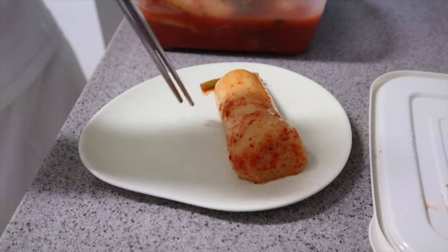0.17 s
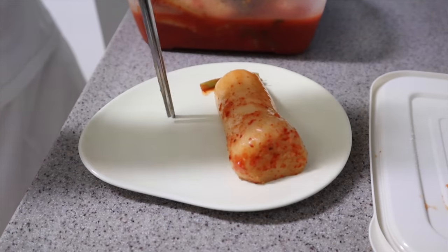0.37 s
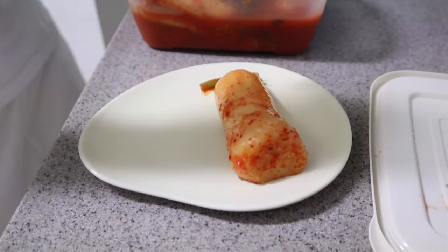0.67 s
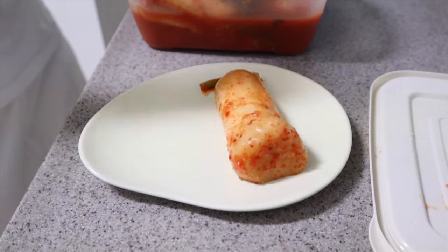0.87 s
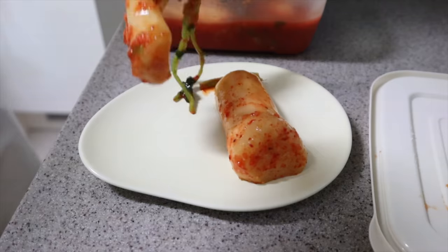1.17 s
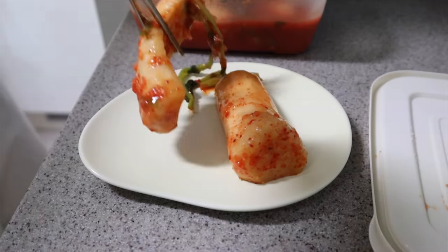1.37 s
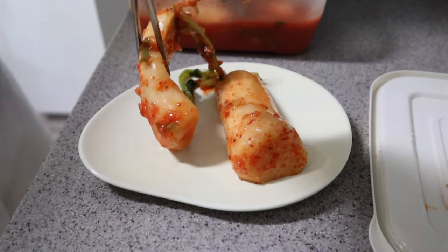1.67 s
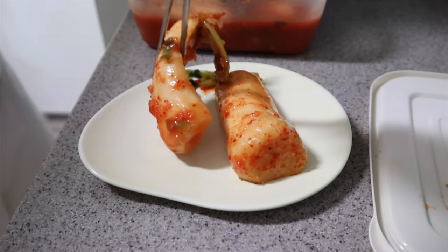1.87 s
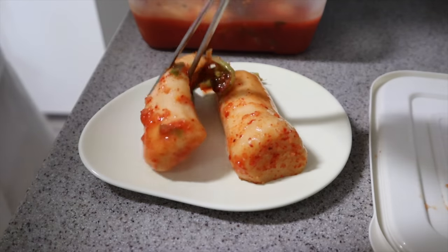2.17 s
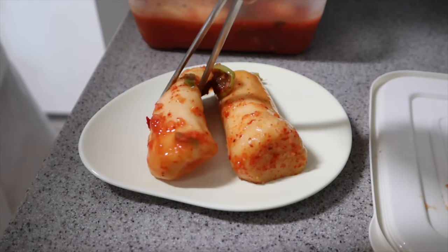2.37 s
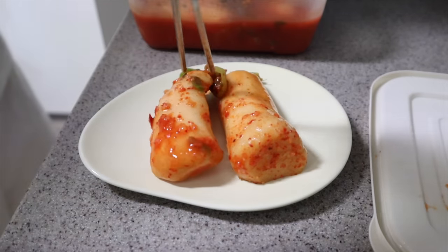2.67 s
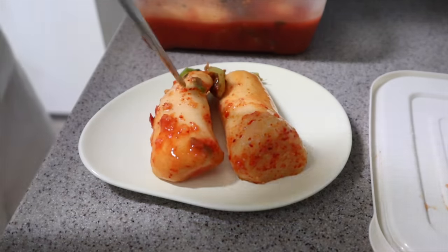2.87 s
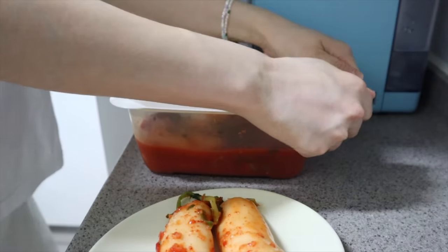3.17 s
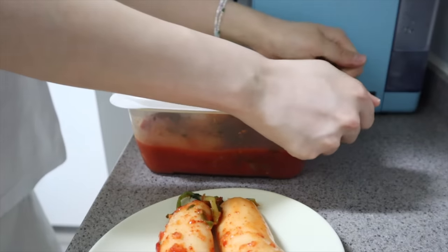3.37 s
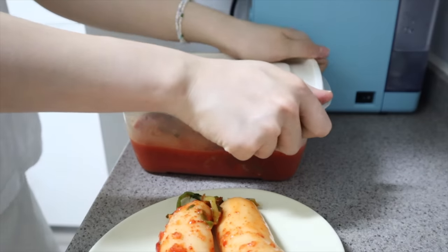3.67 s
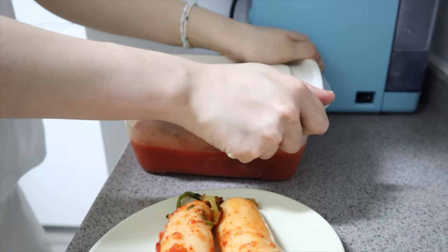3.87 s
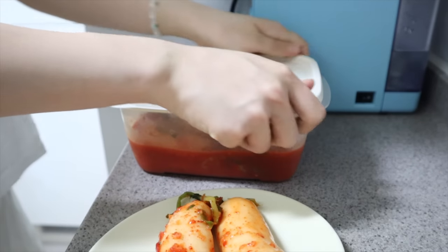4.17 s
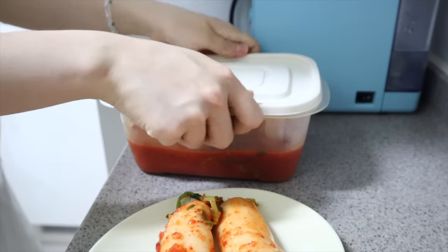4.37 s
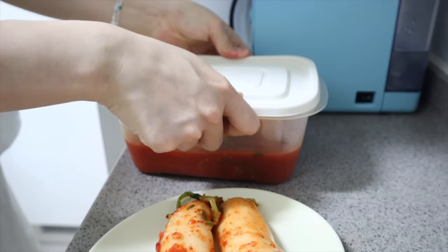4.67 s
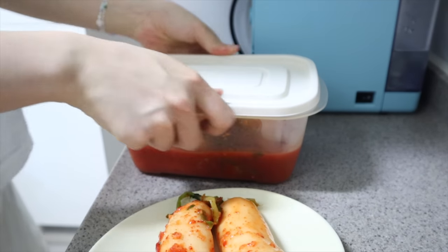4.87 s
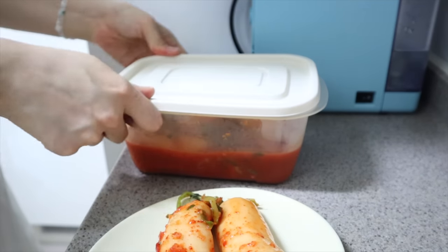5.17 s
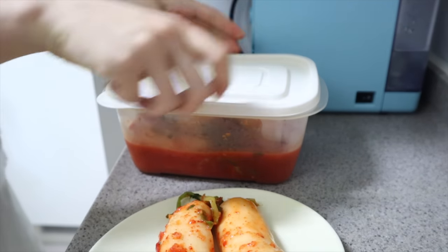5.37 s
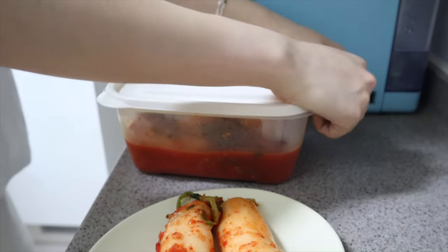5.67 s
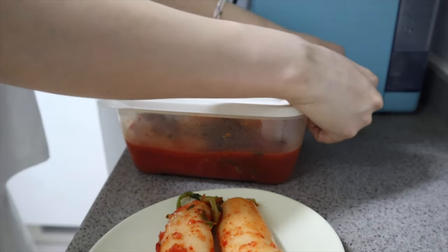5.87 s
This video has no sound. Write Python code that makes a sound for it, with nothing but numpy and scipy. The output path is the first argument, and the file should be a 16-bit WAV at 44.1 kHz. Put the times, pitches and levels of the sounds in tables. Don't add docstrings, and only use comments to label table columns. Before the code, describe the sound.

A low, slightly uneven appliance rumble runs throughout a small, hard-walled kitchen, heard closely in stereo. A tiny tick comes at 0.24 s, then steel tongs clack on a ceramic plate at 0.34 s, bright and loud, and again more softly at 0.49 s, with a short rattle and thin decaying ring. From about 1.0 to 2.9 s there are only sparse, faint wet ticks of food and tongs over the hum. At 3.3 s hands start on a plastic tub lid: skin rubs, creaks and hollow low knocks cluster around 3.4-3.9 s. A sharper knock lands at 4.1 s, with clicks and scuffs to 4.6 s, lighter touches at 4.85 and 5.02 s, and a strong crack at 5.11 s. Soft brushing follows, then busy knocks at 5.64-5.78 s. At 5.92 s the lid seats with the loudest snap, boomy and crisp, then a brief creak.

```python
import sys
import numpy as np
from scipy import signal
from scipy.fft import rfft, irfft, next_fast_len
from scipy.io import wavfile
from scipy.ndimage import uniform_filter1d, map_coordinates

SR = 44100
rng = np.random.default_rng(int(sys.argv[2]) if len(sys.argv) > 2 else 0)


def invert_db(x):
    u = np.asarray(x, float) / 20
    return 10 ** u


def generate_wav(sig):
    pcm = np.round(np.clip(np.atleast_2d(sig).T, -1, 1) * 32767).astype(np.int16)
    wavfile.write(sys.argv[1], SR, pcm)


N = 265305

# start in seconds, peak level in dB, time the tips stay on the glaze in seconds.
TONG_TAPS = [
    (0.3433, 2.5, 0.16),
    (0.4913, -0.5, 0.12),
]
# frequency in Hz, width in Hz, level in dB.
LID_PANEL = [(525, 73, 2), (665, 110, 1), (758, 127, 0), (1175, 446, -5.5), (1389.4, 190, -4),
             (1643, 110, -12.5), (1960, 500, -16), (2610, 380, -20)]
# frequency in Hz, density in dB per Hz.
RIM_COLOUR = [(880, 3), (1500, -8), (1940, -8), (3280, -14.5), (3960, -13), (6000, -22.5), (10000, -24.5),
              (16000, -30)]
# frequency in Hz, level in dB.
NEAR_SIDE = [(60, -41), (250, -21.5), (500, -15), (1000, -5.5), (3000, 1.5), (6000, 4), (10000, 8.5),
             (15000, 3.5)]


def unit(x):
    return x / np.sqrt(np.mean(x ** 2) + 1e-20)


def along(points, hz):
    f, v = np.transpose(points)
    return np.interp(np.log(hz + 1), np.log(f + 1), v)


def wobble(rate):
    knots = rng.standard_normal(int(N * rate / SR) + 4)
    return map_coordinates(knots, [np.arange(N) * rate / SR])


def filtered(x, response):
    m = next_fast_len(N + SR // 4)
    return irfft(rfft(x, m) * response(np.fft.rfftfreq(m, 1 / SR)), m)[..., :N]


def body(modes):
    def response(f):
        total = 0
        for k, (hz, width, db) in enumerate(modes):
            damping = 1j * f * abs(width)
            total = total + (-1) ** k * invert_db(db) * damping / (hz * hz - f * f + damping)
        return total
    return response


def add(track, s, sound):
    spot = track[round(s * SR):][:len(sound)]
    spot += sound[:len(spot)]


def burst(t60, size):
    x = rng.standard_normal(size) * invert_db(-60 * np.arange(size) / SR / max(t60, 1e-3))
    return x / np.linalg.norm(x)


def rumble():
    # frequency in Hz, density in dB per Hz.
    air_colour = [(12, -33), (24, -9), (38, -5), (86, -3.5), (163, -11.5), (182, -18.5), (277, -18),
                  (434, -21.5), (558, -22.5), (607, -20.5), (1530, -28.5), (3070, -36), (8890, -48),
                  (12100, -50), (16000, -80.5)]
    # frequency in Hz, level in dB.
    diffuse_side = [(60, -31), (130, -13), (290, 2), (640, 2), (1410, 4.5), (3100, 6), (6820, 6.5),
                    (15000, 5.5)]
    # time in seconds, rumble level in dB.
    load = [
        (0, -45),
        (.3, -43.5),
        (0.901, -45.5),
        (1.3, -44),
        (2.6, -45.5),
        (6.02, -44),
    ]
    colour = lambda f: invert_db(along(air_colour, f) + [0 * f, along(diffuse_side, f)])
    pair = filtered(rng.standard_normal((2, N)), colour)
    level_db = np.interp(np.arange(N) / SR, *np.transpose(load)) + 0.91 * wobble(3.94)
    return invert_db(level_db) * pair / pair[0].std()


def kitchen(x):
    # frequency in Hz, t60 in seconds.
    wall_decay = [(100, 0.29), (1000, 0.16), (4000, 0.0655), (12000, 0.075)]
    hz, t, z = signal.stft(rng.standard_normal((2, SR // 3)), SR, nperseg=256)
    z[1] *= invert_db(along(NEAR_SIDE, hz) + 3)[:, None]
    fade = invert_db(-60 * t / along(wall_decay, hz)[:, None])
    tail = signal.istft(z * fade, SR, nperseg=256)[1]
    late = np.pad(x, (150, 0))[None]
    return signal.fftconvolve(late, tail / np.linalg.norm(tail[0]), axes=1)[:, :N]


def ticks(rows):
    out = np.zeros(N)
    for s, db, hz, t60 in rows:
        b, a = signal.iirpeak(min(hz, SR / 3), 2.5, SR)
        snap = signal.lfilter(b, a, signal.lfilter(b, a, burst(t60, size=6000)))
        add(out, s, invert_db(db) * snap / np.abs(snap).max())
    return out


def plate():
    plate_hz = [624, 930, 1140, 1520, 1740, 2150, 2742, 2921, 3045, 3200, 3535, 3780, 3845, 4250, 5143,
                6080, 6610, 7130, 7800, 9141, 9700, 10400, 11600, 13000]
    # width in Hz, level in dB at the first spot, level in dB at the second.
    clack_modes = [(77, -21.5, -14), (90.23, -20, -13), (69.3, -21.5, -13.5), (120.2, -16.5, -13),
                   (80, -20, -13), (89.8, -16.5, -10), (80.4, -19, -7.5), (69.7, -17, -11),
                   (64.85, -10.5, -10), (75, -6.5, -3.5), (59.8, -10, -7.5), (120, -2.5, -5.5),
                   (59.97, -4.5, 1.5), (150, -19, -11.5), (106, -4, -6.5), (100, -14.5, -27),
                   (121, -23, -31), (90, -28.5, -22), (169.7, -32, -39), (70.1, -20, -33.5),
                   (299.6, -37, -34), (70.1, -23.5, -19.5), (149.8, -22.5, -27.5), (99.8, -32, -37)]
    # frequency in Hz, level in dB, t60 in seconds.
    ring_modes = [(615, -10, 0.3), (900, -13, .6), (1208.5, -13, 0.52), (1740, -15.5, 0.4),
                  (764, -18.5, 0.26), (2143, -12, 0.34), (2315, -14.5, 0.2), (3150, -4.5, 0.25),
                  (3672, -11, .25), (3800, -9, .35), (5190, -7, 0.3), (6044, -12.5, 0.3), (7133, -13, 0.25),
                  (8940, -14, 0.17), (9590, -18, 0.2), (10400, -16, 0.22), (11630, -20, .15),
                  (3720, 3.5, 0.046), (1851, -17.5, .28), (4400, -23, 0.15), (2900, -14.5, 0.19)]
    second_spot_db = [1.5, 6.5, -3, 2, 0, 2.5, -2, 0.5, -4.5, -3, -3.5, -6, -1.5, -0.5, 0.5, -4.5, -1, 1,
                      1.5, -1.5, 0.5]
    # frequency in Hz, density in dB per Hz.
    rattle_colour = [(250, -24.5), (600, -5.5), (900, -5.5), (1700, -0.5), (2500, -6), (4000, -22),
                     (7000, -49.5)]
    ring_db, tip_db, chatter_db, rattle_db = -27, -12.5, -18, -39.5
    second_damps = 1.1
    rings_on = .38
    twin = .012
    out, rattle, t = np.zeros(N), np.zeros(N), np.arange(SR // 4) / SR
    widths, *spots = np.transpose(clack_modes)
    for spot, ((s, db, stay_s), levels) in enumerate(zip(TONG_TAPS, spots)):
        touching = np.clip(1 - (t / stay_s) ** 2, 0, 1)
        shock = body(zip(plate_hz, widths * second_damps ** spot, levels))
        response = irfft(shock(np.arange(SR // 4 + 1) * 2))[:SR // 4]
        clack = np.convolve(response, np.hanning(5))
        add(out, s, invert_db(db + 5.0) * clack / np.abs(clack).max())
        light = response / np.abs(response).max()
        chatter = signal.fftconvolve(light, touching * burst(0.6, size=SR // 4))
        add(out, s, invert_db(db + chatter_db) * chatter)
        add(rattle, s, invert_db(db) * touching)
        for (hz, level, t60), shift_db in zip(ring_modes, second_spot_db):
            drift = np.cumsum(uniform_filter1d(rng.standard_normal(len(t)), size=100)) * 0.055
            pair = np.sin(2 * np.pi * hz * t + drift)
            pair = pair + 0.5 * np.sin(2 * np.pi * hz * (1 + twin) * t - drift)
            fade = invert_db(db + ring_db + level + spot * shift_db - 60 * t / t60)
            add(out, s, fade * (rings_on + (1 - rings_on) * touching) * pair)
        add(out, s, invert_db(db + tip_db) * np.diff(burst(0.004, size=800)))
    rocking = body([(hz, 110, 0) for hz, *_ in ring_modes])
    grit = rng.standard_normal(N) * invert_db(3.05 * wobble(80.57))
    grit = unit(filtered(grit, lambda f: invert_db(along(rattle_colour, f)) * rocking(f)))
    return out + invert_db(rattle_db) * rattle * grit


def brushes():
    # middle in seconds, length in seconds, rms level in dB, centre in Hz.
    swishes = [(3.556, 0.13, -52, 5000), (3.631, 0.02, -58, 6610), (4.14, 0.053, -49, 4040),
               (4.235, 0.036, -46.5, 9500), (4.272, 0.051, -39.5, 8800), (4.335, 0.043, -48, 6000),
               (4.334, 0.03, -46, 10200), (4.358, 0.027, -44.5, 2450), (4.425, 0.051, -45, 1330),
               (4.434, 0.022, -46, 8860), (4.917, 0.088, -65, 6040), (5.05, 0.034, -59, 10000),
               (5.317, 0.039, -49.5, 10400), (5.589, 0.027, -56, 8200), (5.663, 0.024, -45, 5000),
               (5.688, 0.013, -47, 8500), (5.689, 0.016, -46, 1800)]
    out, t = np.zeros(N), np.arange(-3000, 3000) / SR
    for s, length, db, hz in swishes:
        grain = invert_db(36 * uniform_filter1d(rng.standard_normal(len(t)), size=200))
        grain = grain * rng.standard_normal(len(t))
        swish = unit(signal.lfilter(*signal.iirpeak(min(hz, SR / 3), 2.2, SR), grain))
        add(out, s + t[0], invert_db(db) * swish * np.exp(-(2 * t / length) ** 2))
    return out


def scuffs():
    # start in seconds, peak level in dB, contact t60 in seconds.
    touches = [(3.32, -41, .04), (3.607, -33, 0.022), (3.730, -31.5, 0.0049), (3.777, -38, 0.014),
               (4.178, -41, .008), (4.227, -47, .02), (4.286, -29, 0.016), (4.404, -45, .02),
               (4.424, -29.5, 0.053), (4.536, -32, 0.006), (4.815, -39.5, .04), (4.832, -37, 0.016),
               (5.28, -39.5, 0.028), (5.299, -32.5, 0.073), (5.329, -32, 0.016), (5.586, -33, 0.03),
               (5.734, -55, .02), (5.824, -37.5, 0.026)]
    rasp_db = -2
    edge_hz, rise = 2600, 0.076
    knock, rasp, t = np.zeros(N), np.zeros(N), np.arange(5000) / SR
    for s, db, t60 in touches:
        add(knock, s, invert_db(db + 34.5) * burst(t60, size=3000))
        swell = 1 - np.exp(-t / (rise * t60))
        add(rasp, s, invert_db(db + rasp_db + 41) * swell * burst(2.3 * t60, size=5000))
    thin = lambda f: invert_db(along(RIM_COLOUR, f)) * (1j * f / (edge_hz + 1j * f)) ** 2
    return filtered(knock, body(LID_PANEL)) + filtered(rasp, thin)


def tub():
    # start in seconds, peak level in dB, hollow pitch in Hz.
    thuds = [(3.445, -21, 285), (3.465, -24, 285), (3.497, -22.5, 263), (3.519, -23.5, 361),
             (3.623, -30.5, 260), (3.677, -29, 273), (3.738, -21, 238), (3.742, -22.5, 268),
             (3.762, -34, 293), (3.85, -29.5, 264), (3.887, -24, 272), (3.917, -40, 270),
             (4.101, -35.5, 355), (4.225, -29, 240), (4.293, -20, 257), (4.3004, -29, 264),
             (3.73, -26, 201), (4.485, -20, 270), (4.533, -23.5, 288), (4.592, -27.5, 293),
             (4.857, -23.5, 273), (4.885, -23.5, 186), (5.019, -25.5, 287), (5.038, -26, 312),
             (5.112, -14, 284), (5.152, -32, 292), (5.6422, -19.5, 187.6), (5.659, -15, 306),
             (5.697, -18, 284), (5.726, -16.5, 293), (5.738, -22.5, 187), (5.931, -14, 330)]
    # level in dB, frequency in Hz.
    tap_thuds = [(-26.5, 335), (-30, 180)]
    # start in seconds, peak level in dB, pitch in Hz.
    pings = [
        (3.491, -22, 624),
        (3.519, -15, 572),
        (3.777, -29.5, 476),
        (3.832, -35, 794),
        (4.325, -31, 764),
        (4.435, -30, 743),
        (5.585, -35.5, 1260),
        (5.715, -19.5, 773),
        (5.7225, -17, 797),
        (5.784, -33, 790),
    ]
    # start in seconds, peak level in dB, pitch in Hz, t60 in seconds.
    lugs = [(3.397, -50, 2850, .03), (3.501, -29, 3900, .03), (3.7302, -45, 2620, .08),
            (3.777, -42, 1336, 0.054), (3.887, -42, 2625, .07), (3.832, -41, 845, .04),
            (4.109, -31, 2600, .05), (4.286, -26.5, 2630, 0.036), (4.591, -39, 2100, 0.025),
            (4.591, -37, 600, 0.035), (4.832, -48, 2590, .04), (5.112, -22.5, 2560, 0.036),
            (5.586, -39, 2890, .04), (5.642, -24.5, 900, 0.028), (5.685, -38, 1500, .03),
            (5.701, -29, 900, .04), (5.716, -30, 2300, .06), (5.716, -32, 2920, .04),
            (5.721, -27, 1494, .05), (5.783, -25.5, 1376, 0.03)]
    # start in seconds, level in dB.
    shoves = [(0.2, -42), (3.445, -30), (3.739, -33), (3.886, -39.5), (4.1, -39), (4.535, -36),
              (4.638, -39.5), (4.858, -38), (5.11, -31.5), (5.149, -30.5), (5.181, -40), (5.298, -39),
              (5.643, -33), (5.696, -26), (5.979, -24)]
    # frequency in Hz, width in Hz, level in dB.
    worktop = [(57.7, 11, -0.5), (120.2, 10, 4), (170.4, 28, -3)]
    # frequency in Hz, level in dB, t60 in seconds.
    snap_modes = [(54.5, -4, 0.9), (119, 4, 0.33), (159.9, -2.5, 0.1), (272, -3.5, 0.059), (359, -6, 0.081),
                  (520, -5.5, 0.07), (627, -9.5, 0.028), (764, -22, 0.07), (1047, -4.5, 0.022),
                  (1492, -7, 0.044)]
    # start in seconds, level in dB.
    seating = (5.9185, -7.5)
    ring, boom, t = np.zeros(N), np.zeros(N), np.arange(SR // 8) / SR

    def tone(db, hz, t60, rise_s, drift=0):
        return invert_db(db - 60 * t / t60) * np.sin(2 * np.pi * hz * t + drift) * (1 - np.exp(-t / rise_s))

    passed_on = [(s, db, hz) for s, *_ in TONG_TAPS for db, hz in tap_thuds]
    for s, db, hz in list(thuds) + passed_on:
        add(ring, s, tone(db, hz, t60=0.073, rise_s=0.00149))
    for s, db, hz in pings:
        add(ring, s, tone(db, hz, t60=0.035, rise_s=0.00084))
    for s, db, hz, t60 in lugs:
        drift = .4 * np.cumsum(burst(1.5, size=len(t)))
        add(ring, s, tone(db, hz, t60, rise_s=0.0004, drift=drift))
    for s, db in shoves:
        add(boom, s, invert_db(db + 26.0) * np.hanning(60))
    seat_s, seat_db = seating
    for hz, db, t60 in snap_modes:
        add(ring, seat_s, invert_db(seat_db + db - 60 * t / t60) * np.sin(2 * np.pi * hz * t))
    return ring + filtered(boom, body(worktop))


def strokes(rows, db_per_s, rise):
    t = np.arange(N) / SR
    total = 0
    for s, length, db in rows:
        outside = np.clip(np.abs(t - s) - length / 2, 0, 1)
        total = total + invert_db(db - db_per_s * outside * np.where(t < s, rise, 1))
    return total


def lid():
    # start in seconds, peak level in dB, gripped panel pitch in Hz, rim crack in dB.
    knocks = [(3.396, -27.5, 540, -12.5), (3.447, -24.5, 526, -19), (3.491, -26, 590, -4),
              (3.503, -27, 565, -3), (3.519, -19, 550, -11.5), (3.625, -27, 520, -19),
              (3.728, -30, 540, -22), (3.832, -35.5, 820, -16), (3.888, -23.5, 520, -20),
              (4.11, -14, 645, -13), (4.17, -24, 759, -8), (4.285, -34.5, 730, 1), (4.321, -29.5, 764, -6),
              (4.482, -21.5, 764, -22), (4.536, -18, 515, -31), (4.591, -27, 504, -17.5),
              (4.858, -30, 616, -29), (4.8843, -17, 525, -18), (5.019, -20.5, 600, -15),
              (5.033, -20, 607, -11), (5.112, -12, 515, -8.5), (5.15, -13, 560, -15.5),
              (5.6433, -18.5, 520, -28), (5.683, -20.5, 566, -21), (5.7005, -25, 510, -42),
              (5.714, -15, 750, -10.5), (5.783, -19, 780, -18.5), (5.9175, 1, 510, -17.5),
              (5.93, -13, 522, -4.5), (5.955, -26.5, 644, -4)]
    # frequency in Hz, width in Hz, level in dB.
    hollow = [(196.4, 118, -2), (258, 40, 2), (293, 50, 5.5), (355, 44, -3)]
    # frequency in Hz, density in dB per Hz.
    skin = [(590, -44), (1000, -6.5), (1280, -10), (2050, -15), (2620, -5.5), (3010, -8.5), (10400, -11.5),
            (14600, 1), (16000, -65.5)]
    # middle in seconds, length in seconds, creak level in dB.
    presses = [
        (3.47, 0.078, -32),
        (3.76, 0.041, -34.5),
        (3.912, 0.023, -37),
        (4.26, 0.11, -36.5),
        (4.53, 0.049, -29),
        (4.87, 0.025, -38),
        (5.17, 0.042, -57.5),
        (5.31, 0.04, -43),
        (5.68, 0.048, -28),
        (5.98, 0.021, -22),
    ]
    # middle in seconds, length in seconds, hiss level in dB.
    slides = [(3.36, 0.062, -51.5), (3.51, 0.06, -35.5), (3.76, 0.033, -47.5), (4.165, 0.074, -45.5),
              (4.28, 0.041, -33), (4.43, 0.025, -46.5), (4.87, 0.041, -51), (5.02, 0.044, -44.5),
              (5.32, 0.025, -56), (5.68, 0.074, -42), (5.83, 0.035, -51), (5.94, 0.03, -60)]
    contact_s = 0.0207
    grip_db, grip_shrinks = -1.5, 0.26
    knock, grip, crack = np.zeros((3, N))
    for s, db, hz, crack_db in knocks:
        share_db = grip_db - grip_shrinks * (db + 24.5)
        blow = 1.12 * burst(contact_s, size=3000)
        blow[:3] += .45
        add(knock, s, invert_db(db + 27.0) * blow)
        gripped = signal.lfilter(*signal.iirpeak(hz, 8, SR), blow)
        add(grip, s, invert_db(db + share_db + 25.0) * gripped)
        add(crack, s, invert_db(db + crack_db + 39.5) * burst(2.1 * contact_s, size=4000))
    slips = rng.standard_normal(N) * invert_db(8.7 * wobble(60))
    creak = unit(filtered(slips, lambda f: body(LID_PANEL)(f) + invert_db(9.0) * body(hollow)(f)))
    grit = rng.standard_normal(N) * invert_db(2.3 * wobble(250) + 2.7 * wobble(40))
    hiss = unit(filtered(grit, lambda f: invert_db(along(skin, f)) / (1 + (f / 12000) ** 12)))
    rub = invert_db(-6.5) * strokes(presses, db_per_s=172, rise=2.2) * creak
    rub = rub + invert_db(-7.5) * strokes(slides, db_per_s=177, rise=1.02) * hiss
    bright = lambda f: invert_db(along(RIM_COLOUR, f)) * 1j * f / (1500 + 1j * f)
    return filtered(knock, body(LID_PANEL)) + grip + filtered(crack, bright) + rub


def near(china, plastic):
    # frequency in Hz, width in Hz, level in dB.
    right_lean = [(1109, 5700, -6.5)]
    hop, glance = 2048, np.zeros(N)
    x = invert_db(-3.5) * china + plastic
    leaning = china + invert_db(1) * plastic
    for i in range(0, N, hop):
        piece = x[i:i + 2 * hop] * np.hanning(2 * hop)[:N - i]
        add(glance, i / SR, signal.fftconvolve(piece, burst(0.0066, size=600)))

    def lean(f):
        return body(right_lean)(f) * (1j * f / (320 + 1j * f)) ** 2 / (1 + (f / 9000) ** 4)

    side = filtered(glance, lambda f: invert_db(along(NEAR_SIDE, f))) - filtered(leaning, lean)
    return np.array([china + plastic, side])


def scene():
    # start in seconds, peak level in dB, centre in Hz, t60 in seconds.
    wet_ticks = [(0.2438, -37, 9200, 0.028), (0.9694, -56, 6550, 0.0089), (1.0016, -41, 11300, 0.03),
                 (1.0333, -43, 9800, 0.023), (1.068, -60, 4140, 0.03), (1.155, -34, 8500, 0.034),
                 (1.1614, -44, 4850, 0.17), (1.1994, -48, 4290, 0.034), (1.709, -42, 6050, 0.024),
                 (1.8044, -44, 2300, 0.021), (1.8494, -56.5, 10700, 0.04), (1.9584, -47, 4270, 0.018),
                 (2.8497, -49, 9100, 0.037), (2.9186, -51, 8300, 0.034)]
    # start in seconds, peak level in dB, centre in Hz, t60 in seconds.
    rim_clicks = [(3.397, -37, 4050, .015), (3.448, -36.5, 3540, 0.02), (3.5015, -25, 5200, 0.02),
                  (3.519, -25, 7100, 0.018), (3.7305, -39.5, 5200, 0.017), (3.731, -40, 2680, 0.086),
                  (3.888, -36, 2730, 0.053), (4.109, -24, 2800, 0.018), (4.1095, -28.5, 4540, 0.03),
                  (4.177, -30, 4050, 0.011), (4.2855, -21, 4730, 0.018), (4.534, -23.5, 3300, 0.0095),
                  (4.591, -35.5, 2940, .012), (4.832, -34, 2430, .02), (4.877, -42, 2600, 0.021),
                  (4.885, -32, 7600, 0.017), (5.1115, -15, 3750, 0.0095), (5.151, -31, 8500, 0.0098),
                  (5.331, -32, 5500, 0.018), (5.714, -22.5, 7400, 0.044), (5.722, -30, 7500, 0.016),
                  (5.724, -26.5, 4700, 0.022), (5.782, -33, 4100, 0.016), (5.9145, -18, 1110, 0.016),
                  (5.9172, -9, 4000, 0.017), (5.922, -25, 3180, 0.025), (5.931, -16.5, 1460, 0.057),
                  (5.953, -24.5, 2820, 0.033)]
    china = plate() + ticks(wet_ticks)
    plastic = lid() + scuffs() + tub() + ticks(rim_clicks) + brushes()
    plastic = filtered(plastic, lambda f: (1j * f / (26 + 1j * f)) ** 2 / (1 + (f / 12000) ** 30))
    answer = kitchen(invert_db(-13) * china + invert_db(-8.0) * plastic)
    mid, side = near(china, plastic) + answer + rumble()
    return np.array([mid + side, mid - side])


def top_cut(x):
    return signal.sosfilt(signal.butter(12, 16480, fs=SR, output="sos"), x)


def record(dry):
    duck_db, duck_from_db = 3, -24.5

    def follow(tau):
        keep = np.exp(-1 / (tau * SR))
        return signal.lfilter([1 - keep], [1, -keep], np.mean(dry ** 2, 0))

    power, capped_power = follow(0.14), follow(0.14)
    open_gain = (1 + power / invert_db(-28.0)) ** -.2
    capped_gain = invert_db(-duck_db * capped_power / (capped_power + invert_db(2 * duck_from_db)))
    x = filtered(dry, lambda f: 1 / (1 + (f / 14200) ** 12))
    x = x * open_gain * capped_gain
    x = x / (1 + np.abs(x / .93) ** 8) ** (1 / 8)
    return top_cut(x)


dry = scene()
out = record(dry)
generate_wav(out)
```